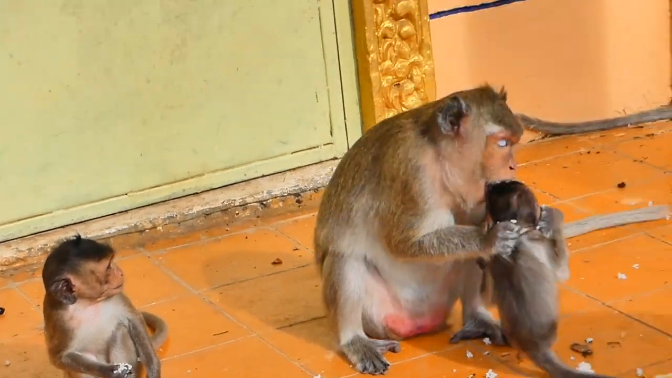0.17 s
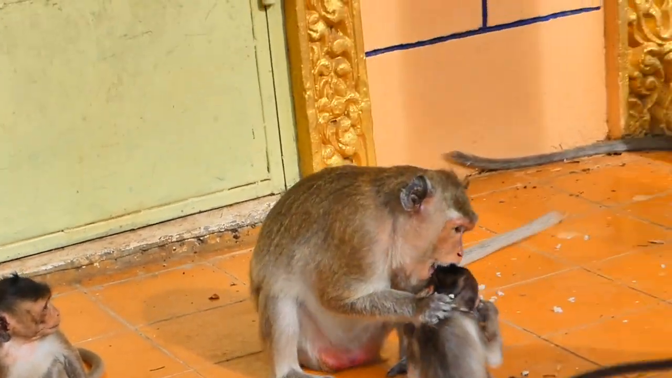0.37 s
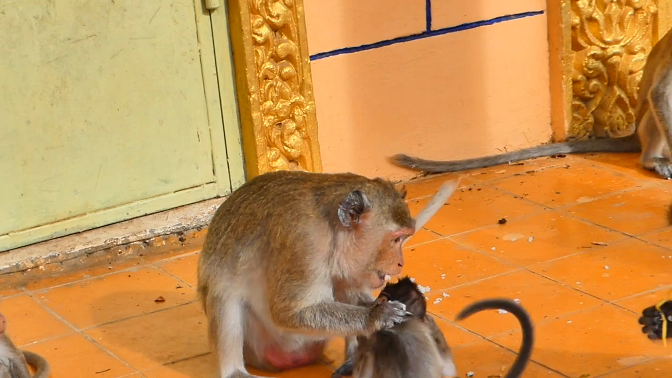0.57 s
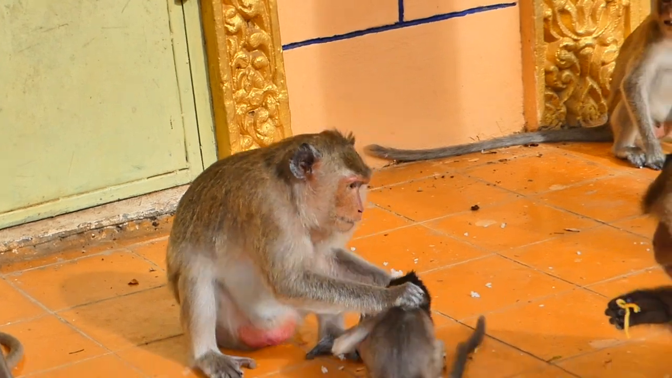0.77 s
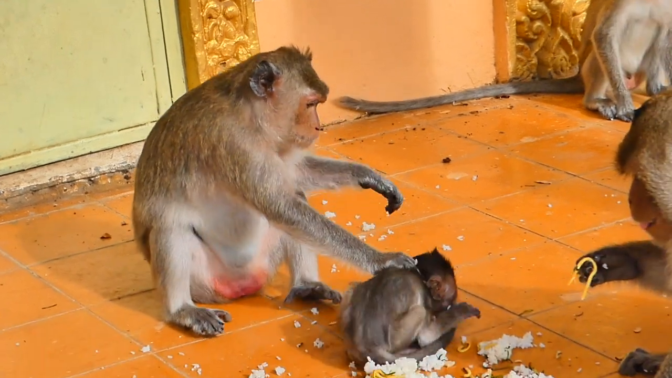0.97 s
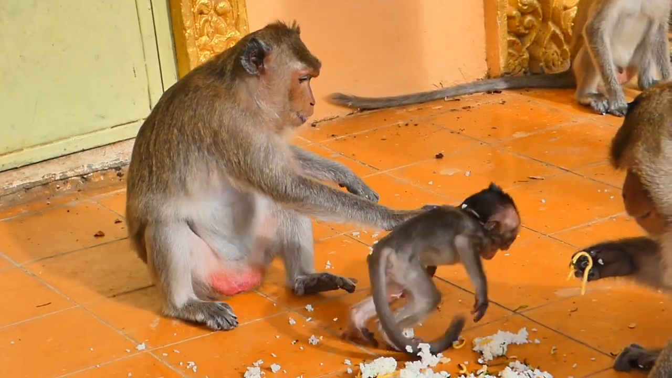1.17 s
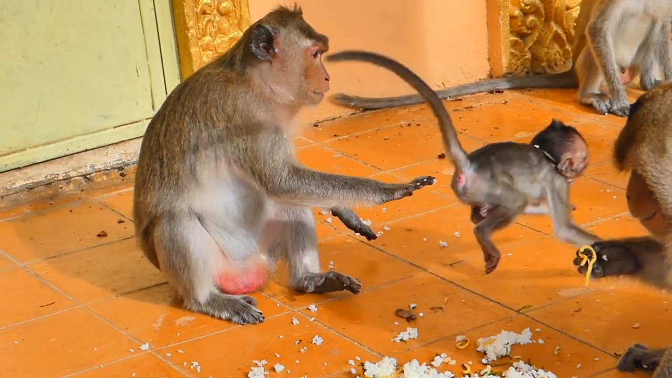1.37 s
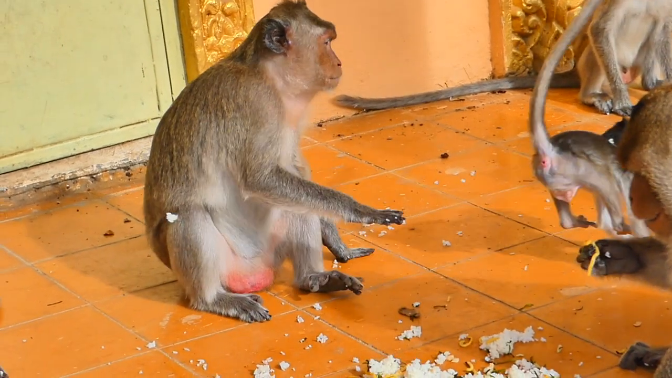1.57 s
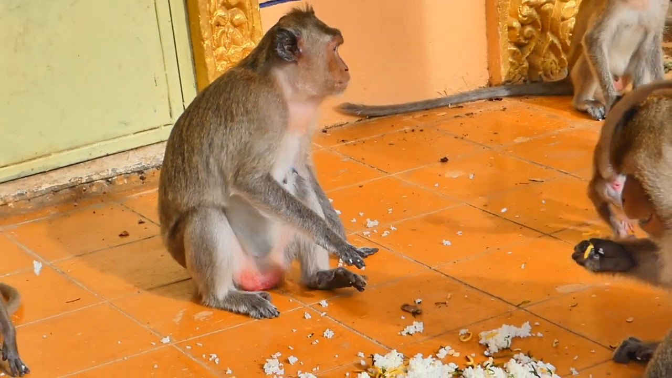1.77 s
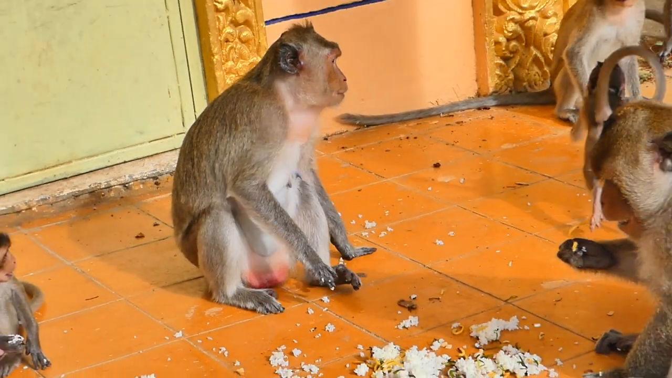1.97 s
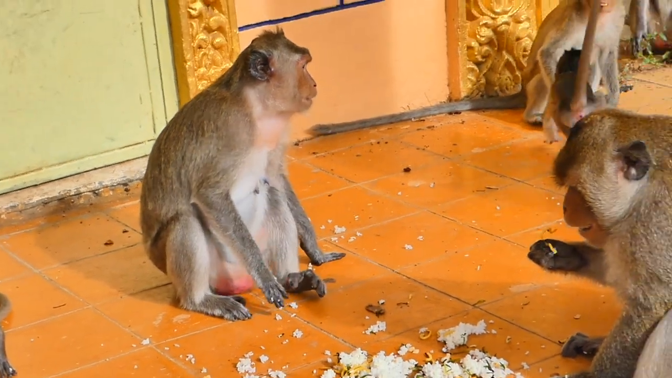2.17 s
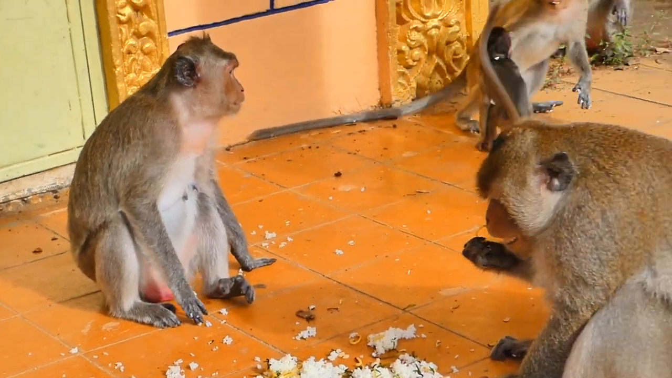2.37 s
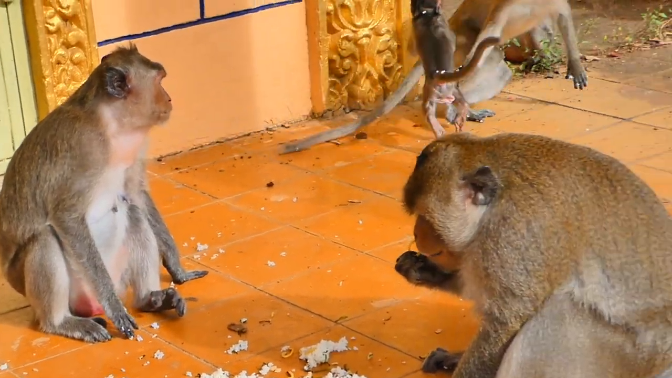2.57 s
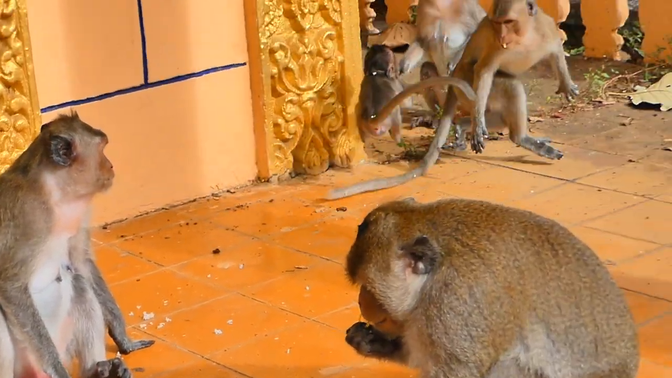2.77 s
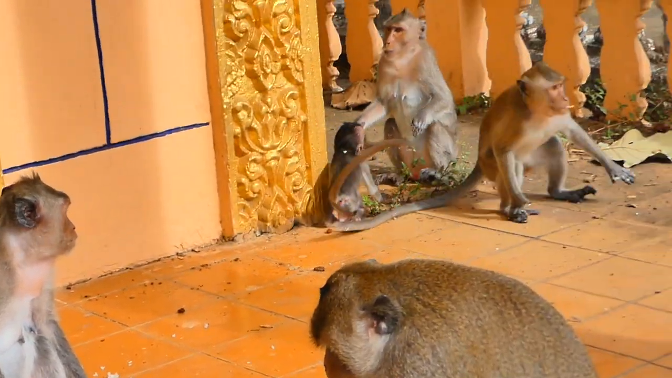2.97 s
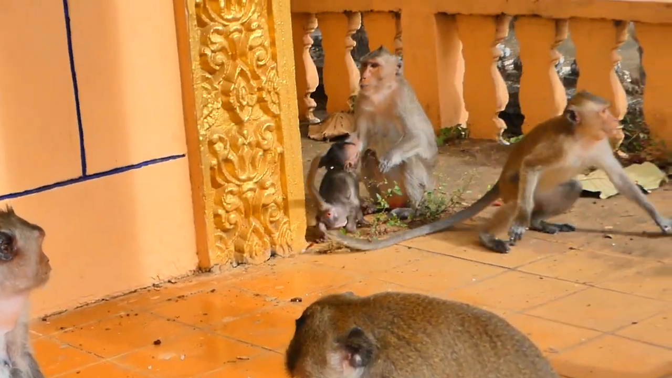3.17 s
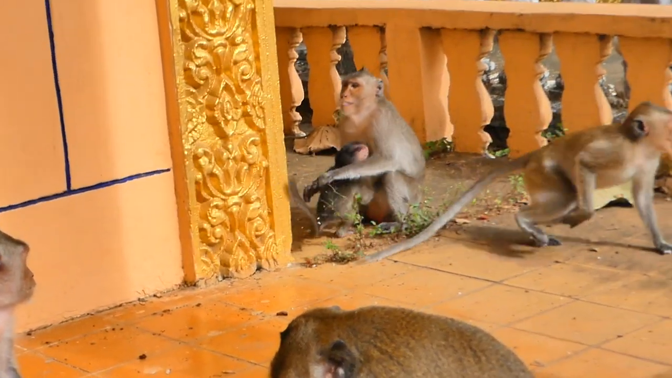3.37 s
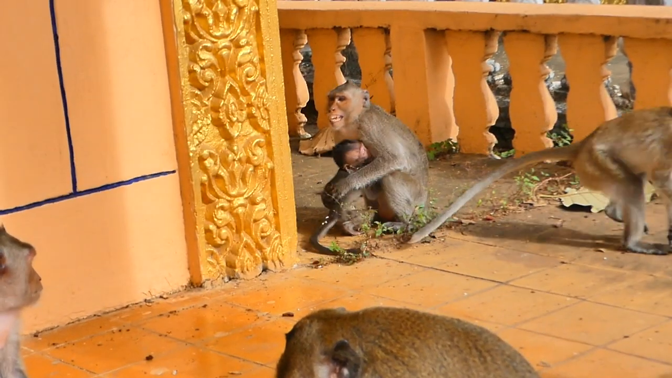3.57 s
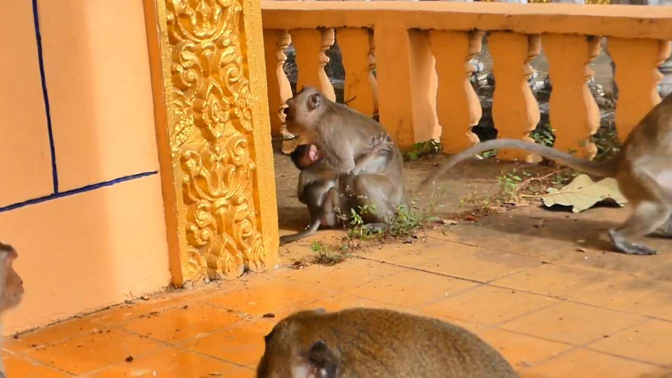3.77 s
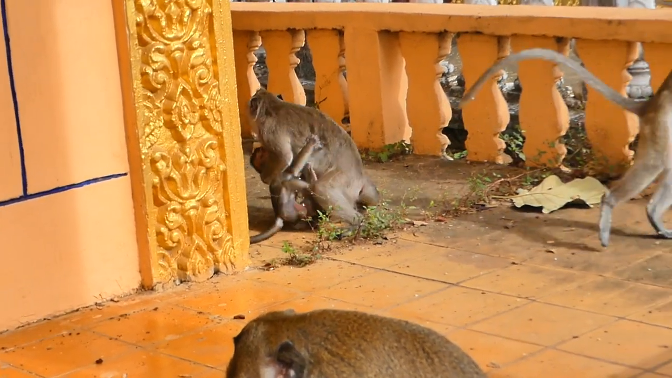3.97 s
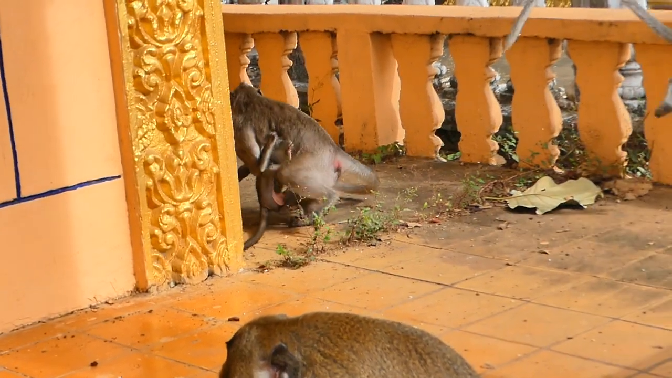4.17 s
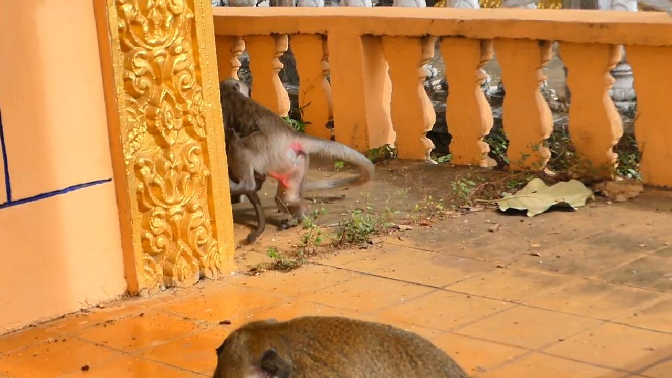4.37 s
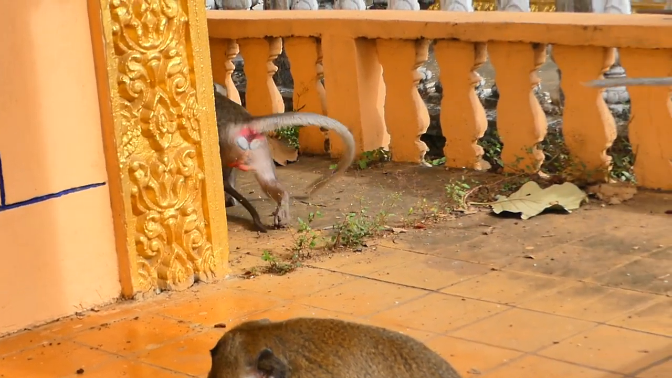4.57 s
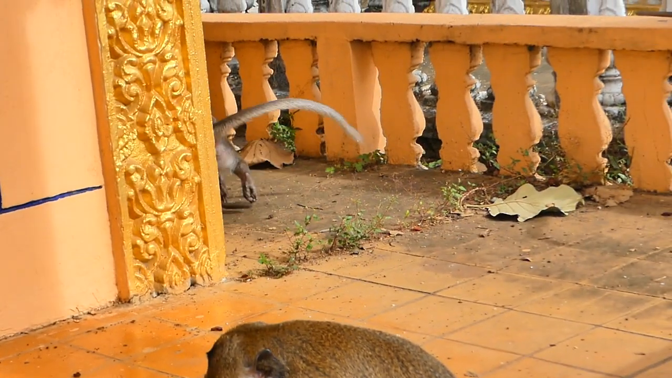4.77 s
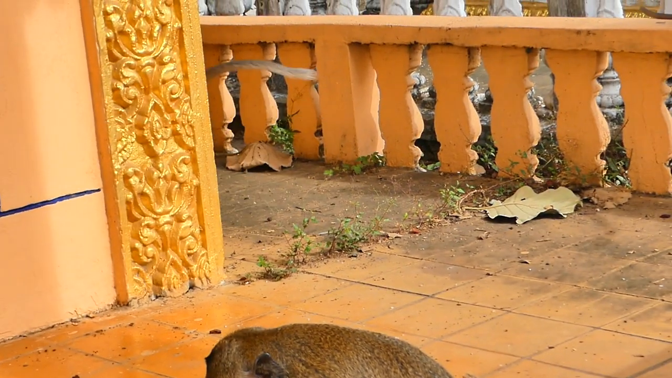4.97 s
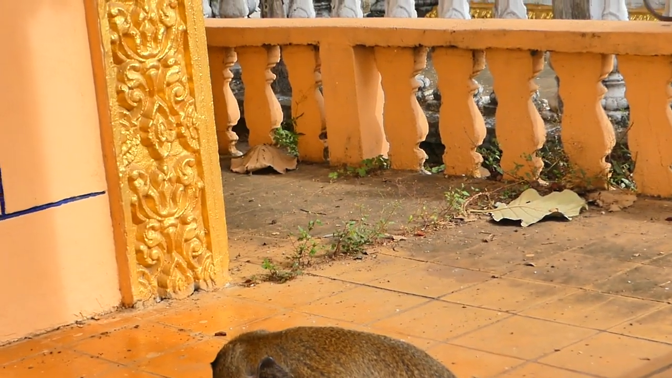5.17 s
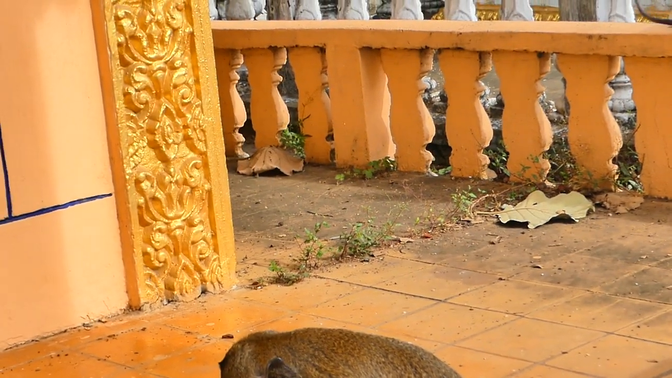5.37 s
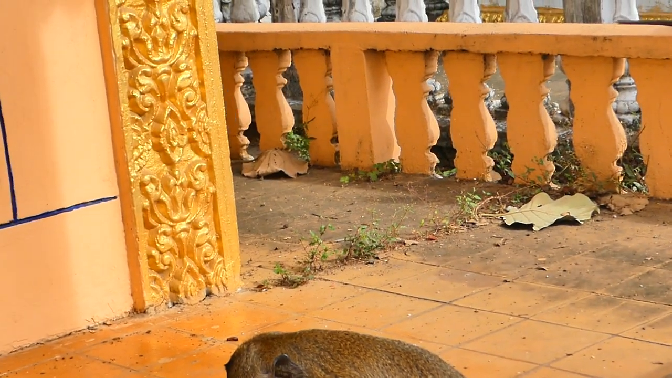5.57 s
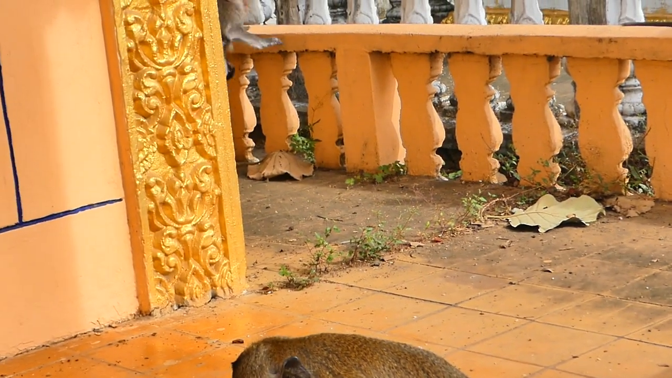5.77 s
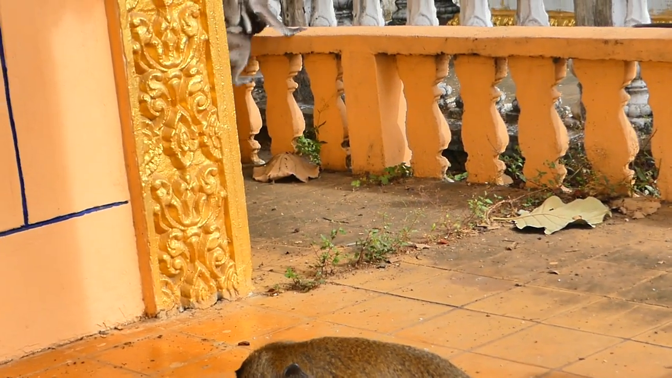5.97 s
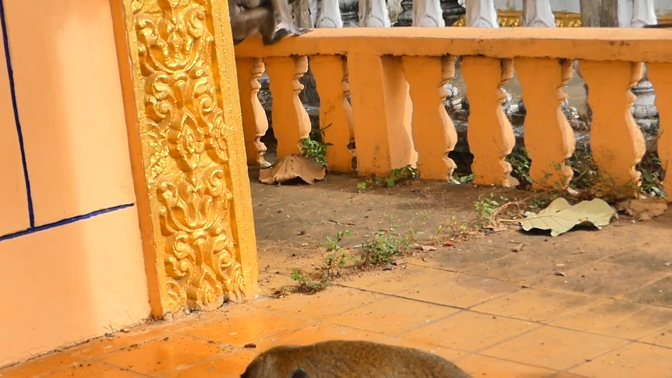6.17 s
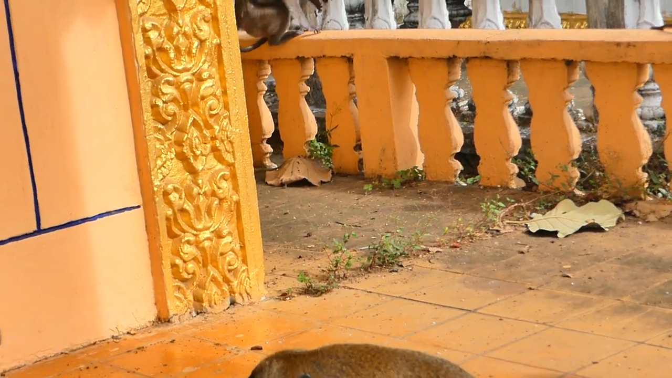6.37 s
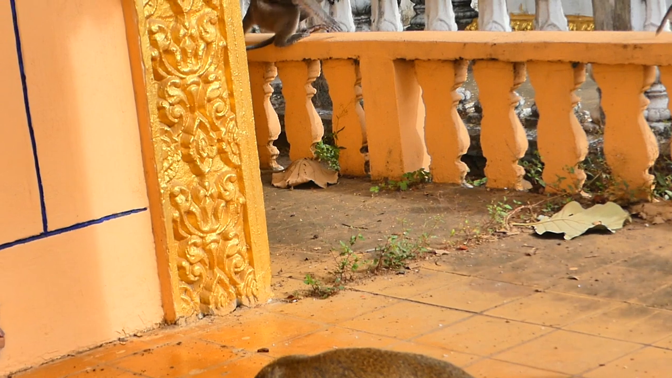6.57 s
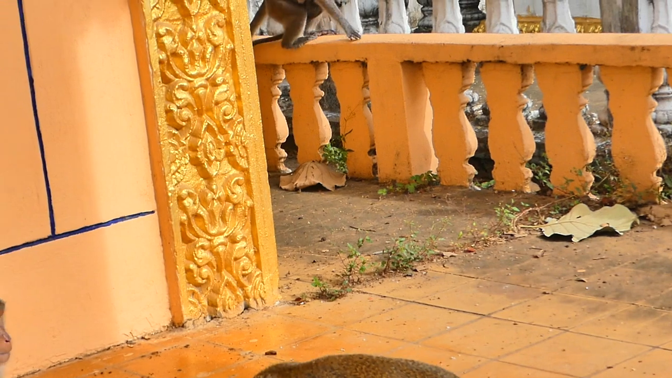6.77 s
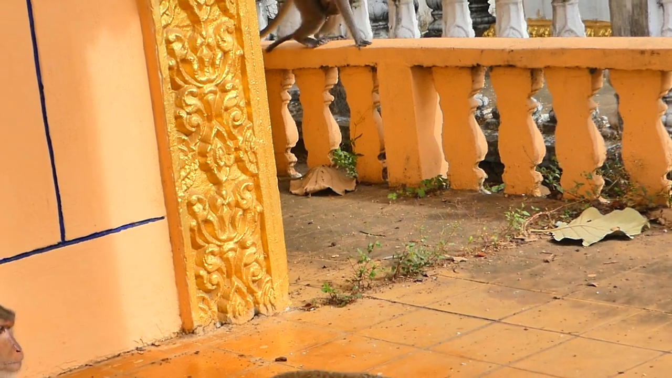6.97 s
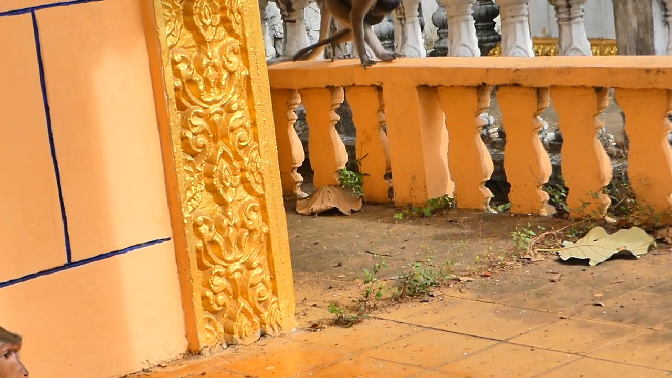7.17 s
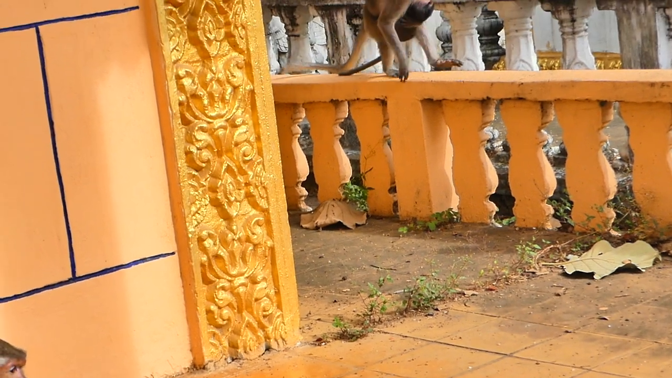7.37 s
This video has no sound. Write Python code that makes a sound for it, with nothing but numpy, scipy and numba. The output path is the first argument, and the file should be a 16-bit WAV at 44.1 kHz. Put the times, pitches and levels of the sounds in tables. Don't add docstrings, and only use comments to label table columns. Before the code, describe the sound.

Long raspy, shrill screams of a baby macaque, slowed down, give way to short barks and weaker far-off cries echoing off walls and tiles.

```python
import sys
import numpy as np
from scipy import signal
from scipy.fft import rfft, irfft, next_fast_len
from scipy.io import wavfile
from numba import njit

SR = 44100
rng = np.random.default_rng(int(sys.argv[2]) if len(sys.argv) > 2 else 0)


def decibels_to_gain(level_db):
    exponent = np.asarray(level_db, float) / 20
    return 10 ** exponent


def to_wav(sig):
    pcm = np.clip(np.atleast_2d(sig), -1, 1) * 32767
    pcm = np.round(pcm).astype(np.int16)
    wavfile.write(sys.argv[1], SR, pcm.T)


N = 327663
FULL_SPEED_S = 6.76


def rms_one(x):
    return x / np.sqrt(np.mean(x ** 2) + 1e-20)


def at_hz(points, hz):
    points = np.array(points)
    return np.interp(np.log(np.maximum(hz, 1)), np.log(points[:, 0]), points[:, 1])


def span(rows):
    s, *columns = np.transpose(rows)
    at = np.arange(int(s[0] * SR), min(int(s[-1] * SR), N))
    fade = np.clip(np.minimum(at - at[0], at[-1] - at) / (0.0041 * SR), 0, 1)
    return at, fade, [np.interp(at / SR, s, c) for c in columns]


def wobble(size, rate_hz):
    r = np.exp(-2 * np.pi * rate_hz / SR)
    settle = 4000
    noise = rng.standard_normal(size + settle)
    return rms_one(signal.lfilter([1], [1, -2 * r, r * r], noise)[settle:])


def band(x, low_hz, high_hz, order=3):
    sos = signal.butter(order, [low_hz, high_hz], "band", fs=SR, output="sos")
    return signal.sosfilt(sos, x)


@njit
def resonate(x, hz, width, rate):
    r, y = np.exp(-np.pi * width / rate), np.zeros(len(x))
    for i in range(2, len(x)):
        drive = (1 - r * r) / 2 * (x[i] - x[i - 2])
        turn = 2 * r * np.cos(2 * np.pi * hz[i] / rate)
        y[i] = drive + turn * y[i - 1] - r * r * y[i - 2]
    return y


# f/Hz, level/dB (per Hz)
HUSH_COLOUR = [(20, -32), (81, -11), (536, -16), (638, -18.5), (1190, -22), (1450, -24.5), (7700, -37),
               (8500, -48)]
# t/s, level/dB
HUSH_STRENGTH = [(0.0, -62.5), (0.14, -66.5), (2.26, -71.5), (2.46, -67.5), (2.73, -71), (3.1, -69),
                 (3.64, -71), (4.28, -70.5), (7.12, -71), (7.43, -73)]
# f/Hz, likeness (-1 opposite to 1 equal)
HUSH_LIKENESS = [(60, -0.43), (240, -0.73), (500, -0.76), (930, -0.58), (1850, -0.07), (3700, 0.35),
                 (7300, -0.04)]
# f/Hz, left minus right level/dB
HUSH_SIDES = [(80, -3.5), (170, -4), (300, 1), (1500, 3), (4300, -4)]


def hush_at(speed):
    size = next_fast_len(N)
    hz = np.fft.rfftfreq(size, 1 / SR) / speed
    mid, side = rfft(rng.standard_normal((2, size)))
    alike = np.clip(at_hz(HUSH_LIKENESS, hz), -1, 1)
    lean = decibels_to_gain(at_hz(HUSH_SIDES, hz) / 2)
    both, apart = np.sqrt(1 + alike) * mid, np.sqrt(1 - alike) * side
    colour = decibels_to_gain(at_hz(HUSH_COLOUR, hz)) * (hz > 8)
    pair = irfft(colour * np.array([(both + apart) * lean, (both - apart) / lean]), size)[:, :N]
    return pair / np.std(band(pair.mean(0), 250, 900))


def outdoor_hush():
    t = np.arange(N) / SR
    level = decibels_to_gain(np.interp(t, *np.transpose(HUSH_STRENGTH)))
    return np.where(t < FULL_SPEED_S, hush_at(1), hush_at(2)) * level


def note(start_s, length_s, from_hz, to_hz, db):
    share = np.array([0, .25, 1 - 0.36, 1])
    level_db = db + np.array([-6, 0, 0, -8.5])
    return np.transpose([start_s + length_s * share, from_hz + (to_hz - from_hz) * share, level_db])


def fading(start_s, length_s, from_hz, to_hz, db):
    return [(start_s, from_hz, db), (start_s + length_s, to_hz, db - 16)]


# f/Hz, level/dB
OVERTONE_THROAT = [(800, -20), (1300, -16), (1800, 6), (2700, -1), (3500, -2), (4600, -7.5), (5600, -14),
                   (8000, -28)]


def tone(rows, count, tremble, flutter_db, hoarse=0.62):
    at, fade, (hz, level_db) = span(np.array(rows))
    shake = .5 * wobble(len(at), 40) + wobble(len(at), 260)
    phase = 2 * np.pi * np.cumsum(hz * (1 + tremble * shake)) / SR
    speed = 1 + (at[0] > FULL_SPEED_S * SR)
    top_hz = 7200 + 900 * (count == 1)
    out = np.zeros(N)
    for k in range(1, count + 1):
        weight_db = at_hz(OVERTONE_THROAT, k * hz / speed) if count > 1 else 0
        flutter = decibels_to_gain(flutter_db * wobble(len(at), 60)) * (1 + hoarse * wobble(len(at), 190))
        strength = np.sqrt(2) * fade * flutter * decibels_to_gain(level_db + weight_db)
        out[at] += strength * np.sin(k * phase) * (k * hz < top_hz)
    return out


# start t/s, length t/s, from f/Hz, to f/Hz, level/dB
ADULT_GRUNTS = [
    (3.845, .125, 174, 168, -64),
    (5.909, 0.074, 243, 258, -67.5),
]


def grunts():
    return sum(tone(note(*row), count=1, tremble=.01, flutter_db=1, hoarse=0) for row in ADULT_GRUNTS)


# start t/s, length t/s, from f/Hz, to f/Hz, level/dB
CLEAR_SQUEALS = [(0.0, .03, 7850, 7750, -41), (0.49, .22, 7350, 7260, -53), (1.44, .27, 6850, 6700, -52),
                 (2.2, .24, 7500, 7350, -51), (.8, .2, 4850, 5050, -52), (0.1, 0.18, 5000, 4370, -50),
                 (1.421, .26, 2620, 2353, -51), (2.101, .1, 2870, 2840, -57),
                 (3.28, 0.2, 7670, 7500, -60.5), (3.54, 0.17, 7580, 7280, -58.5),
                 (3.414, 0.1, 1370, 1443, -60), (5.201, .26, 2117, 1990, -59), (3.66, .07, 1700, 1650, -62),
                 (5.68, .24, 1745, 2030, -59), (6.43, .105, 2400, 2720, -56),
                 (6.599, 0.085, 2152, 1670, -51.5), (6.83, .07, 1700, 1810, -69),
                 (3.64, 0.077, 5600, 5420, -54), (6.35, .12, 1900, 1750, -63),
                 (2.879, 0.082, 2300, 2290, -56.5)]
# start t/s, length t/s, from f/Hz, to f/Hz, level/dB
DYING_SQUEALS = [
    (0.032, .065, 7650, 7100, -30),
    (4.828, .19, 2200, 1930, -56),
    (5.44, .26, 2020, 1900, -62),
    (6.525, .09, 2680, 2700, -63),
]
# t/s, f/Hz, level/dB
WANDERING_SQUEALS = [
    [(2.55, 4400, -54.5), (2.65, 4250, -65.5), (2.82, 4180, -61), (3.02, 4330, -63), (3.07, 4350, -52.5),
     (3.14, 4350, -61), (3.17, 3800, -61), (3.31, 3920, -60.5), (3.51, 3620, -61)],
    [(5.76, 2450, -70), (5.79, 2750, -62.5), (5.89, 3280, -59.5), (6.02, 3480, -61), (6.088, 2560, -55),
     (6.2, 2480, -76)],
]


def squeals():
    notes = [note(*row) for row in CLEAR_SQUEALS]
    notes += [fading(*row) for row in DYING_SQUEALS]
    notes += list(WANDERING_SQUEALS)
    return sum(tone(rows, count=1, tremble=.012, flutter_db=3) for rows in notes)


# start t/s, length t/s, from f/Hz, to f/Hz, level/dB (before the throat weights the overtones)
VOICED_CRIES = [(4.14, 0.018, 717, 750, -59), (4.245, .037, 888, 878, -53), (4.369, 0.041, 704, 686, -58),
                (4.517, 0.052, 742, 682, -62), (4.669, .06, 697, 657, -60), (6.295, .085, 874, 915, -69),
                (6.685, 0.095, 944, 800, -62), (6.765, .05, 1630, 1660, -62)]
# start t/s, length t/s, from f/Hz, to f/Hz, level/dB
ROUGH_CRY = [
    (5.59, .18, 1510, 1690, -64),
]


def cries():
    voiced = sum(tone(note(*row), count=10, tremble=.012, flutter_db=3, hoarse=.4) for row in VOICED_CRIES)
    rough = sum(tone(note(*row), count=3, tremble=.015, flutter_db=3) for row in ROUGH_CRY)
    return voiced + rough


def chaotic_folds(size):
    regime = np.cumsum(rng.random(size) < 45 / SR)
    pitch_hz = 780 * np.exp(.16 * rng.standard_normal(size)[regime])
    erratic = rng.uniform(.015, .16, size)[regime]
    shake = np.exp(erratic * wobble(size, 400) + .02 * wobble(size, 20))
    turns = np.cumsum(pitch_hz * shake) / SR
    pulses = np.diff(np.floor(turns), prepend=0) * decibels_to_gain(2 * rng.standard_normal(size))
    return rms_one(pulses) + .6 * rng.standard_normal(size)


# t/s, body level/dB, top level/dB
FULL_SPEED_SCREAM = [(7.34, -92, -78.5), (7.374, -49, -53.5), (7.388, -48, -47), (7.43, -51, -58)]
# f/Hz, width f/Hz, level/dB
FULL_SPEED_THROAT = [(3150, 130, -1), (4100, 48, -0.5), (5860, 52, 4), (7630, 70, -23), (9600, 50, -10),
                     (12700, 120, -27)]


def last_scream():
    at, fade, (body_db, top_db) = span(FULL_SPEED_SCREAM)
    source = chaotic_folds(2 * len(at))[::2]
    peaks = 0
    for hz, width_hz, db in FULL_SPEED_THROAT:
        fixed_hz = np.full(len(at), float(hz))
        peaks = peaks + decibels_to_gain(db) * resonate(source, fixed_hz, max(width_hz, 150.), SR)
    voice = rms_one(peaks) + 1.6 * rms_one(source)
    body = decibels_to_gain(body_db) * rms_one(band(voice, 2700, 6130))
    top = decibels_to_gain(top_db) * rms_one(band(voice, 5600, 11500, order=1))
    out = np.zeros(N)
    out[at] = np.maximum(fade, at > N - 400) * (body + top)
    return out


def formant(hz, width_hz, skirt_hz, low_hz, high_hz, broad, lift, rasp_db):
    size = len(hz)
    source = chaotic_folds(size)
    peak = resonate(source, hz * (1 + .015 * wobble(size, 30)), width_hz, SR) * decibels_to_gain(2 * wobble(size, 14))
    skirt = resonate(source, lift * hz, skirt_hz, SR)
    skirt = resonate(skirt, lift * hz, skirt_hz, SR) * decibels_to_gain(1.5 * wobble(size, 9))
    voice = band(rms_one(peak) + broad * rms_one(skirt), low_hz, high_hz)
    return rms_one(voice * decibels_to_gain(rasp_db * wobble(size, 88)))


def scream(rows):
    at, fade, (throat_db, throat_hz, mouth_db, mouth_hz, top_db, top_hz) = span(rows)
    top_hz = top_hz * (1 + 0.041 * wobble(len(at), 4.1))
    if 4 < rows[0][0] < 5:
        throat = formant(throat_hz, 380., 1900., 1450, 4300, broad=.8, lift=1.03, rasp_db=1.34)
        top_edge_hz = 7300
    else:
        throat = formant(throat_hz, 300., 2400., 1405, 4300, broad=1.6, lift=1.03, rasp_db=1.34)
        top_edge_hz = 9500
    mouth = formant(mouth_hz, 270., 3000., 3460, 6300, broad=1.5, lift=1.02, rasp_db=1.1)
    top = formant(top_hz, 400., 4500., 4900, top_edge_hz, broad=1.5, lift=0.923, rasp_db=1.64)
    voice = decibels_to_gain(throat_db) * throat + decibels_to_gain(mouth_db) * mouth + decibels_to_gain(top_db) * top
    out = np.zeros(N)
    out[at] = fade * voice * decibels_to_gain(0.22 * wobble(len(at), 56))
    return out


def breathed(start_s, length_s, db, shrill_db, throat_hz, mouth_hz, top_hz, breath, mouth_share):
    swell_db, peak, end_db, release_s, glide = breath
    attack_s, silent_db = .016, -20.5
    peak_s = max(peak * length_s, attack_s + .005)
    s = start_s + np.array([0, attack_s, peak_s, length_s, length_s + release_s])
    effort_db = np.array([silent_db, swell_db, 0, end_db, silent_db])
    throat = throat_hz * glide ** np.clip((s - start_s) / length_s, 0, 1)
    upper_db = db + (1 + 0.34) * effort_db
    flat = np.ones_like(s)
    return np.transpose([s, db + effort_db, throat, upper_db + mouth_share * shrill_db, mouth_hz * flat,
                         upper_db + shrill_db, top_hz * flat])


# start t/s, length t/s, level/dB, shrillness level/dB, throat f/Hz
EBBING_SCREAMS = [
    (3.627, .08, -50, -3, 2250),
    (4.82, .05, -55.5, -25, 2020),
    (5.168, 0.25, -49, -4, 2200),
    (5.626, 0.15, -60.5, -12, 1800),
    (5.755, .32, -53, -2, 2600),
    (6.343, 0.17, -55.5, -15, 2050),
]
# swell level/dB, peak as share of length, end level/dB, release t/s, throat glide (ratio)
EBBING_BREATH = (-4, .55, -4, .1, .97)


def ebbing_screams():
    return sum(scream(breathed(*row, mouth_hz=4700., top_hz=6500., breath=EBBING_BREATH, mouth_share=0.47))
               for row in EBBING_SCREAMS)


# start t/s, length t/s, level/dB, shrillness level/dB, throat f/Hz
BARKED_SCREAMS = [
    (3.524, .085, -53, 0, 2380),
    (4.14, 0.065, -45, -14, 2350),
    (4.241, .11, -41.5, -16, 2240),
    (4.369, 0.12, -42.5, -22.5, 2250),
    (4.515, .125, -46, -17.5, 2250),
    (4.672, 0.12, -48, -14, 1950),
    (6.602, .07, -53, -17, 2000),
]
# swell level/dB, peak as share of length, end level/dB, release t/s, throat glide (ratio)
BARKED_BREATH = (-3, .5, -5, .04, .85)


def barks():
    return sum(scream(breathed(*row, mouth_hz=4800., top_hz=6180., breath=BARKED_BREATH, mouth_share=.65))
               for row in BARKED_SCREAMS)


# start t/s, length t/s, level/dB, shrillness level/dB, mouth f/Hz
BROKEN_SCREECHES = [
    (2.78, 0.17, -58, -0.5, 4360),
    (2.939, .235, -54.5, 7, 4470),
    (3.185, .07, -59, 1, 4800),
    (3.265, .11, -56.5, 3, 5140),
    (3.39, .075, -62.5, 11.5, 5300),
]
# swell level/dB, peak as share of length, end level/dB, release t/s, throat glide (ratio)
SCREECH_BREATH = (-5, .6, -4, .065, 1.0)


def broken_screeches():
    out = np.zeros(N)
    for *timing_and_level, mouth_hz in BROKEN_SCREECHES:
        out += scream(breathed(*timing_and_level, throat_hz=2250., mouth_hz=mouth_hz, top_hz=7050.,
                               breath=SCREECH_BREATH, mouth_share=0.45))
    return out


# t/s, effort level/dB, shrillness level/dB, mouth opening f/Hz, throat f/Hz
CLOSE_SCREAM = [
    [(0.0, -43, -3, 4830, 2580), (0.042, -63, 14, 5080, 2590), (0.062, -41.5, 2.5, 5170, 2520),
     (0.17, -47, -5.5, 4880, 2670), (0.215, -43, 3, 4500, 2720), (0.43, -42.5, 0, 5000, 2060),
     (0.57, -45, 5, 4850, 2710), (0.8, -45.5, 2.5, 4850, 2280), (1.01, -41.5, -2, 4980, 2730)],
    [(1.0, -47, -1, 4950, 2750), (1.17, -44, -3, 4820, 2560), (1.3, -43, -2.5, 4900, 2590),
     (1.47, -49.5, 5.5, 4700, 2630), (1.8, -49.5, 1, 4440, 2700), (2.2, -49.5, 3, 4600, 2755),
     (2.555, -45, 5, 4400, 2050), (2.624, -57, -6.5, 4560, 2400), (2.72, -76, 6, 4220, 2160)],
]
# t/s, hollow f/Hz, depth (0-1)
TILE_HOLLOW = [(.3, 3930, 0), (.6, 4070, 0), (.82, 4200, 1), (1.05, 3840, 1), (1.2, 4000, 0.5),
               (1.43, 3720, 0.8), (1.85, 3780, 0.9), (2.2, 3650, 0.46), (2.6, 3470, 0.27)]


def near_scream():
    out = np.zeros(N)
    for rows in CLOSE_SCREAM:
        s, effort_db, shrill_db, mouth_hz, throat_hz = np.transpose(rows)
        loud_db = effort_db + np.maximum(shrill_db, 0)
        throat_db = -51 + 0.58 * (loud_db + 43.5) + np.minimum(loud_db + 53.5, 0)
        top_hz = np.full(len(s), 6990.)
        out += scream(np.transpose([s, throat_db, throat_hz, effort_db, mouth_hz, effort_db + shrill_db, top_hz]))
    at, fade, (hollow_hz, depth) = span(TILE_HOLLOW)
    out[at] -= fade * np.clip(depth, 0, 1) * resonate(out[at], hollow_hz, 600., SR)
    return out


def terrace(x, wet_db=-9, tail_db=-20):
    t = np.arange(int(.5 * SR)) / SR
    quick, slow = rng.standard_normal((2, 2, len(t)))
    scatter = quick * decibels_to_gain(-60 * t / 0.14) * (t > .004) / np.sqrt(0.0032 * SR)
    tail = band(slow, 1000, 4000, order=1) * decibels_to_gain(-60 * t / .45) * (t > .02) / np.sqrt(.006 * SR)
    echoes = decibels_to_gain(wet_db) * scatter + decibels_to_gain(tail_db) * tail
    return signal.fftconvolve(x[None], echoes, axes=1)[:, :N]


# t/s, left minus right level/dB
VOICE_SIDES = [(0, 3.5), (3, 2.5), (5, 3), (7.4, 2)]


def scene():
    voices = grunts() + squeals() + cries() + last_scream()
    voices += ebbing_screams() + barks() + broken_screeches() + near_scream()
    lean = decibels_to_gain(np.interp(np.arange(N) / SR, *np.transpose(VOICE_SIDES)) / 2)
    return (voices + terrace(voices)) * [lean, 1 / lean] + outdoor_hush()


def roll_off(x):
    return signal.sosfilt(signal.butter(12, 15650, fs=SR, output="sos"), x)


def record(dry):
    def chain(speed):
        notched = signal.lfilter(*signal.iirnotch(3796 * speed, 45., fs=SR), dry)
        edge = signal.ellip(12, .5, 75, 7918 * speed, fs=SR, output="sos")
        return signal.sosfilt(edge, notched)
    fast = np.clip((np.arange(N) / SR - FULL_SPEED_S) / .006 + 1, 0, 1)
    played = (1 - fast) * chain(1) + fast * chain(2)
    return roll_off(played)


dry = scene()
out = record(dry)
to_wav(out)
```